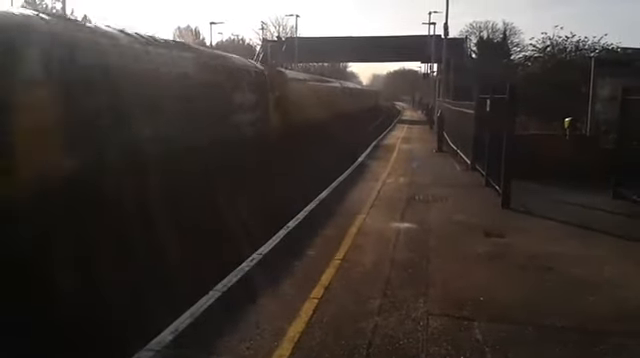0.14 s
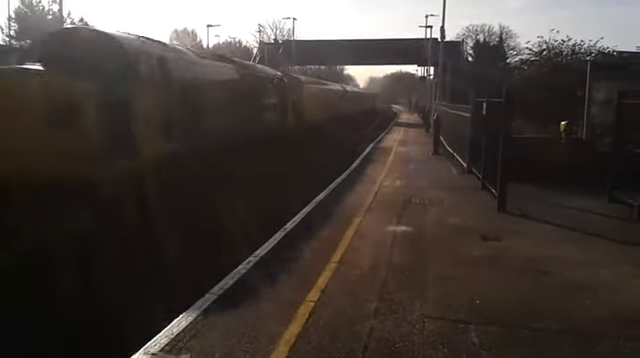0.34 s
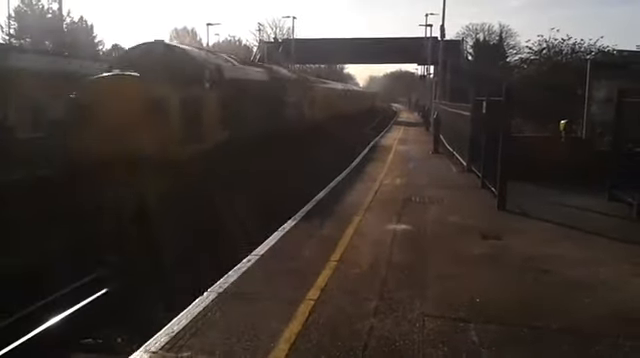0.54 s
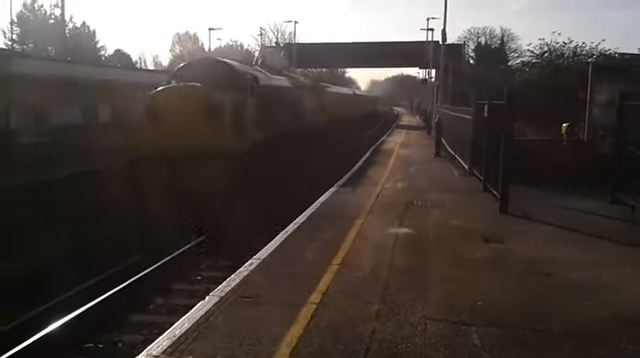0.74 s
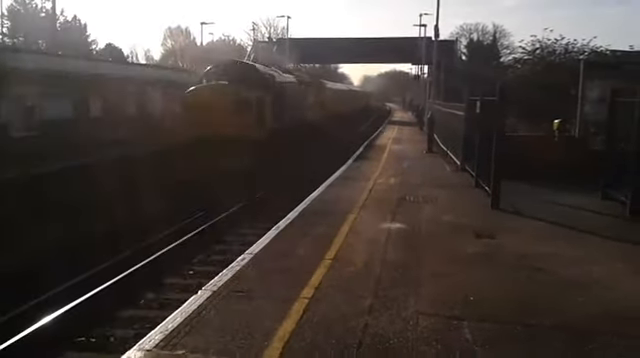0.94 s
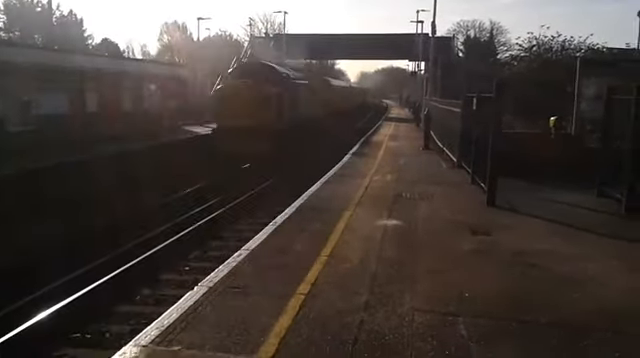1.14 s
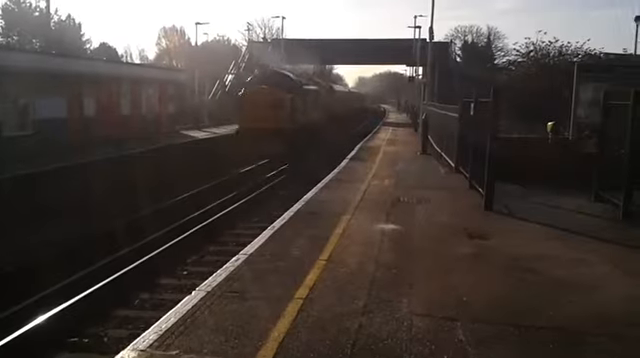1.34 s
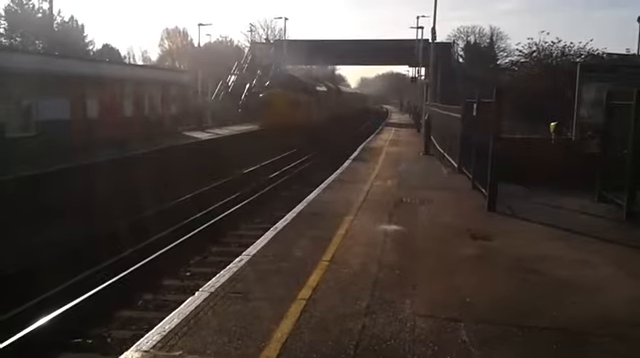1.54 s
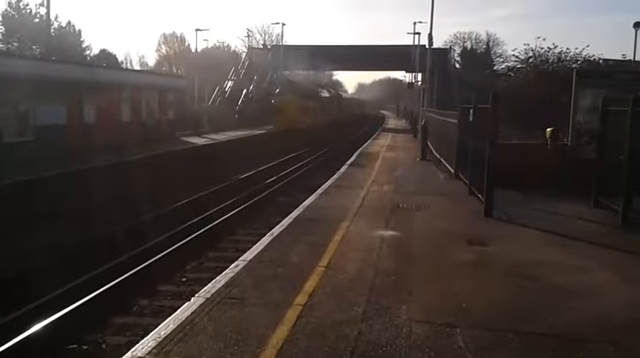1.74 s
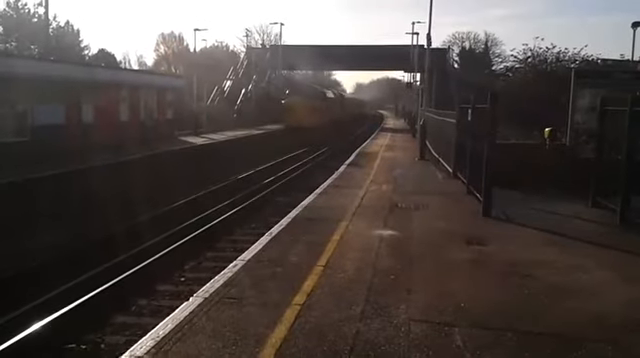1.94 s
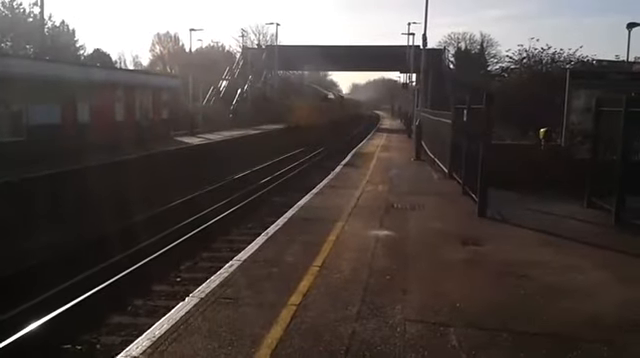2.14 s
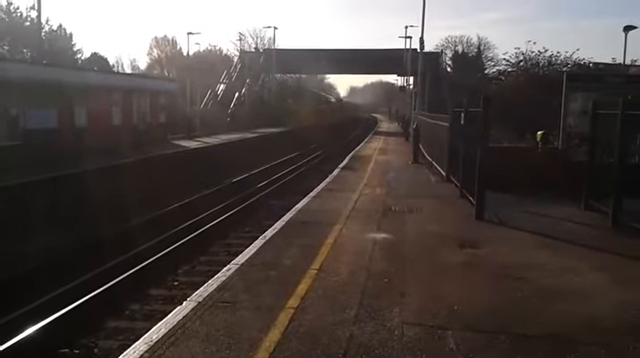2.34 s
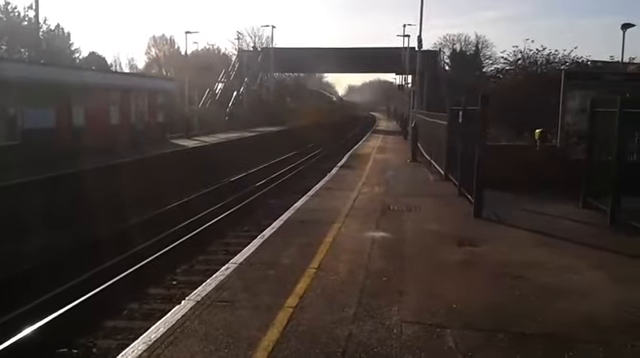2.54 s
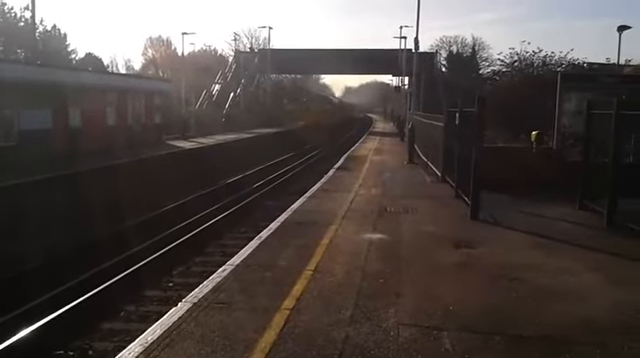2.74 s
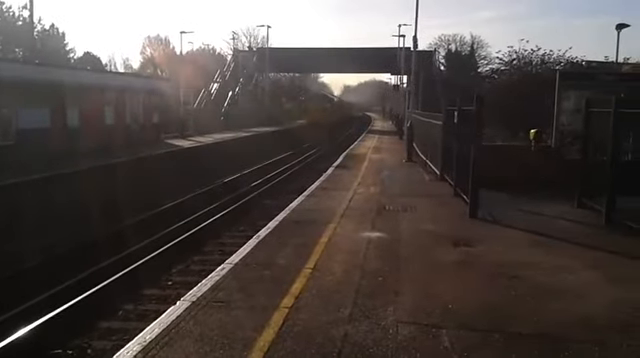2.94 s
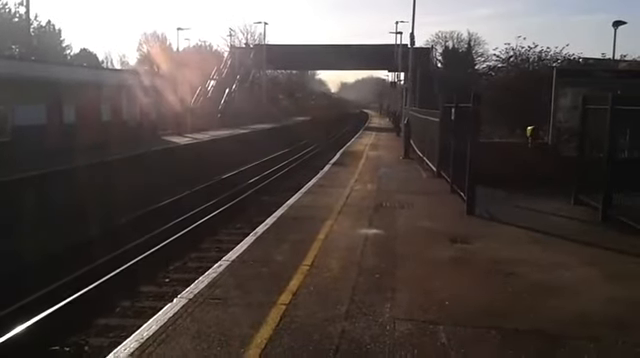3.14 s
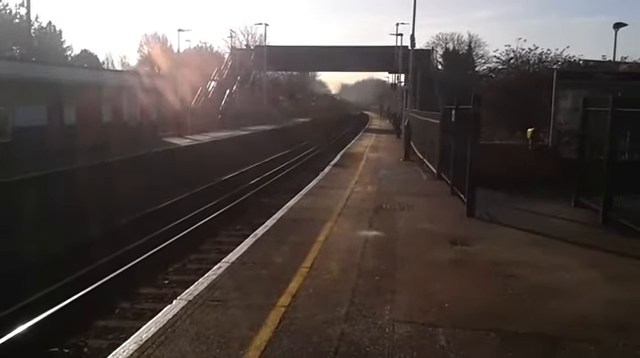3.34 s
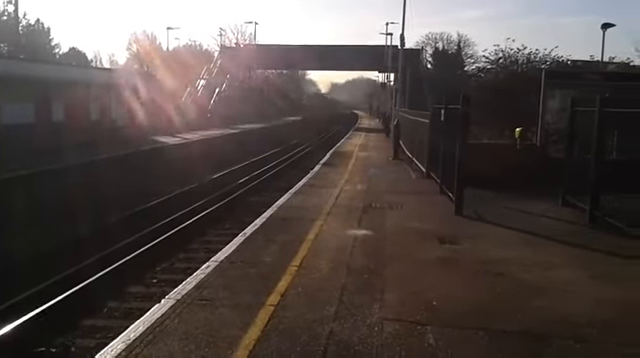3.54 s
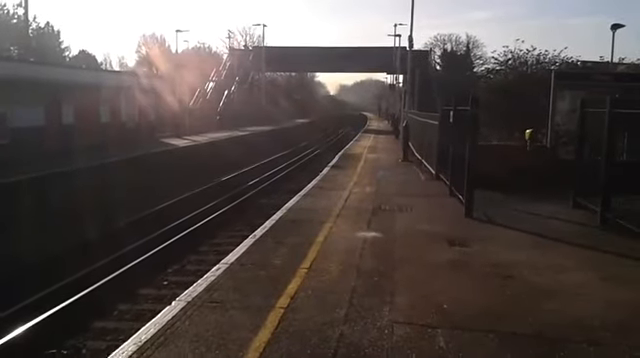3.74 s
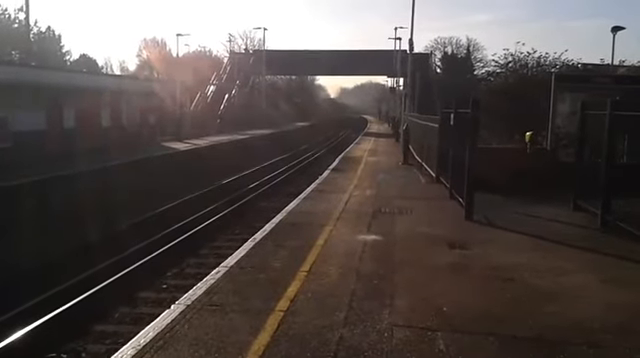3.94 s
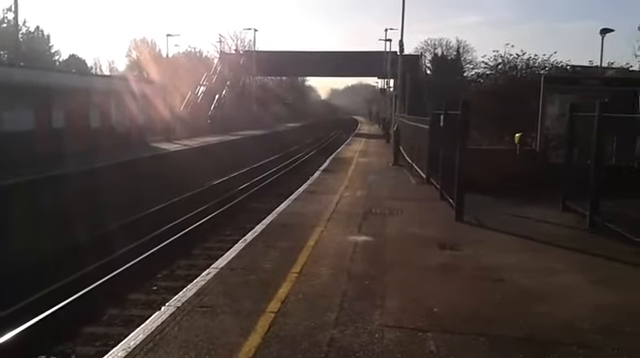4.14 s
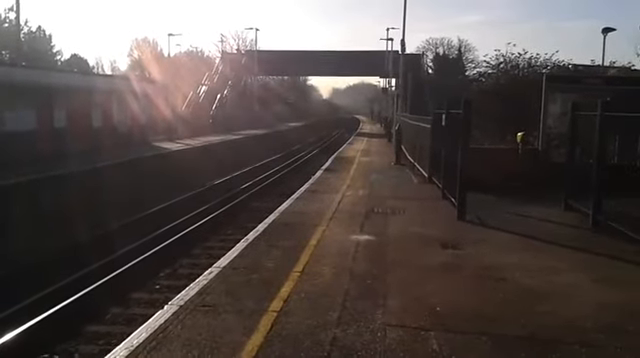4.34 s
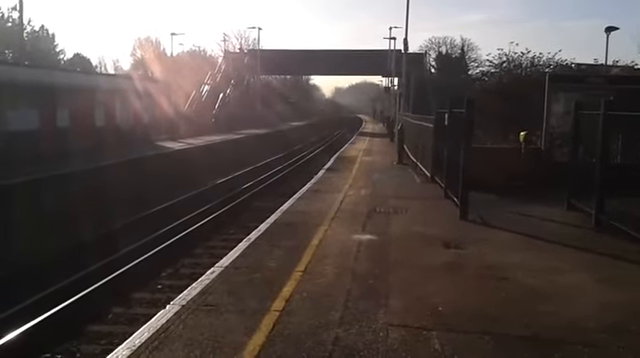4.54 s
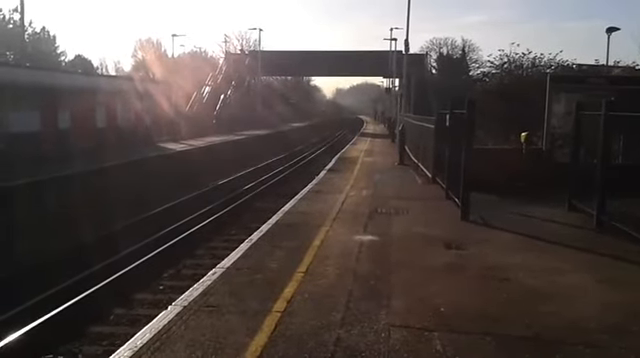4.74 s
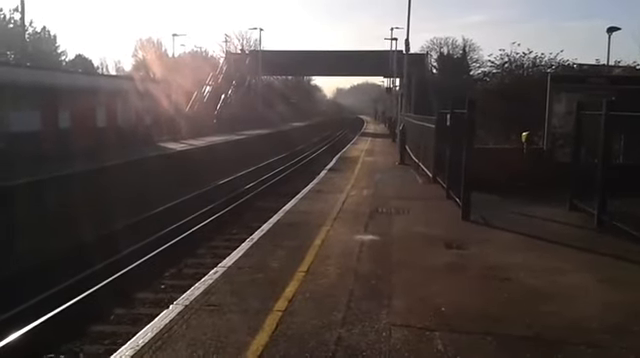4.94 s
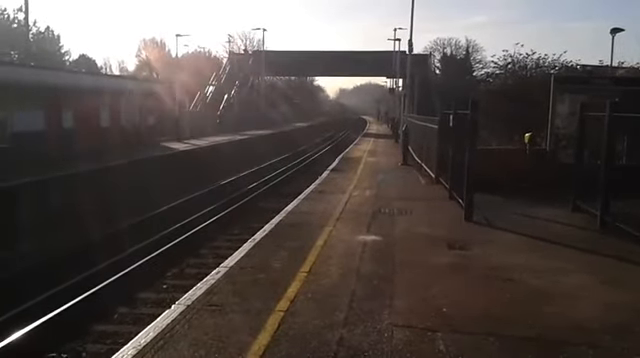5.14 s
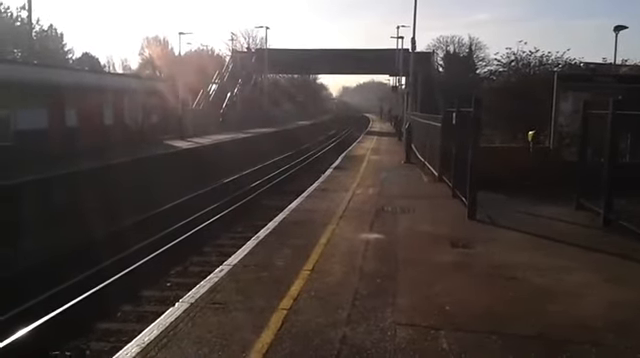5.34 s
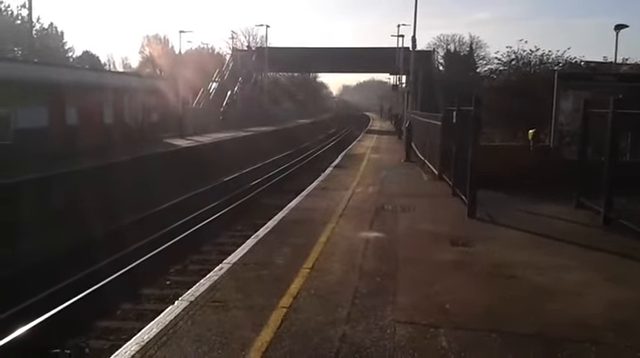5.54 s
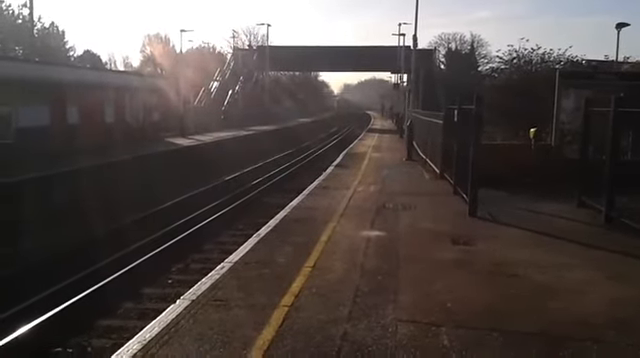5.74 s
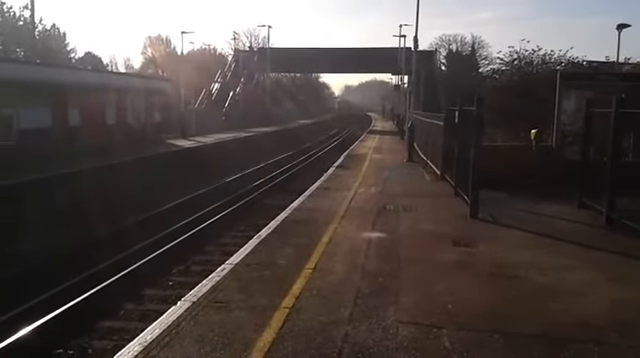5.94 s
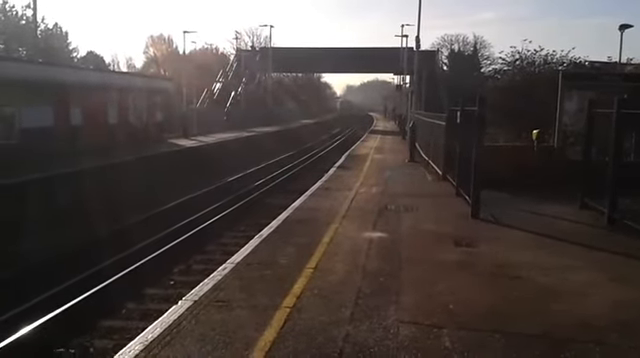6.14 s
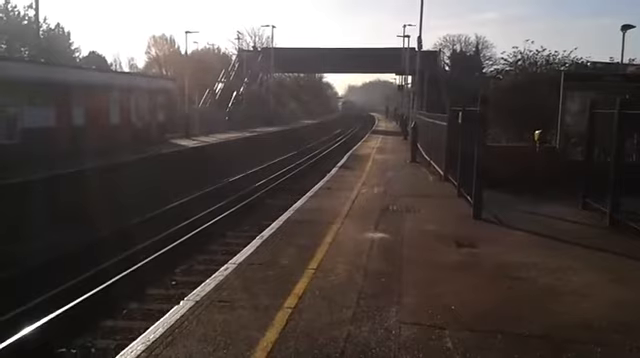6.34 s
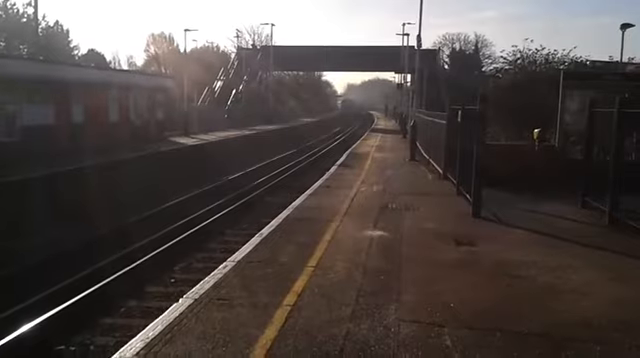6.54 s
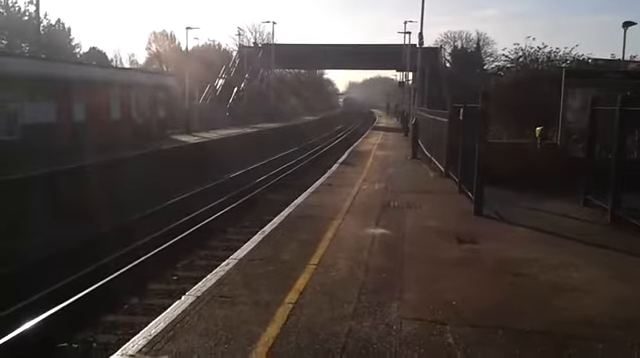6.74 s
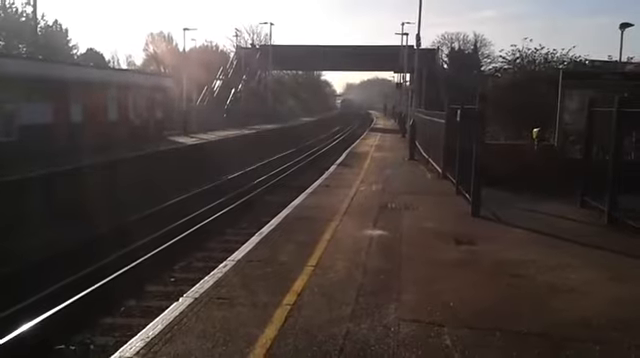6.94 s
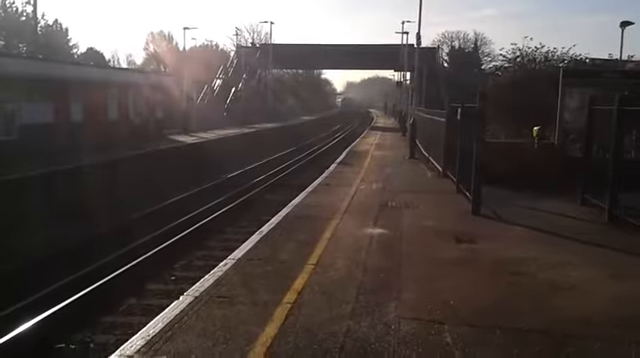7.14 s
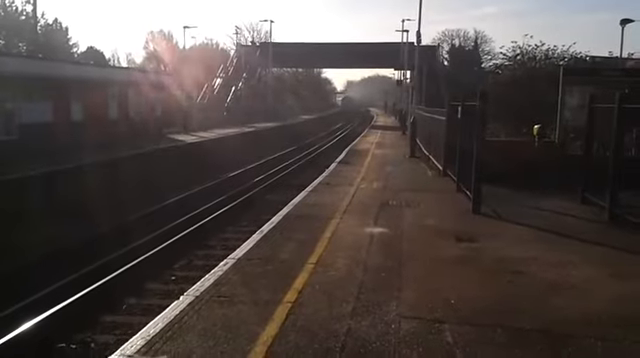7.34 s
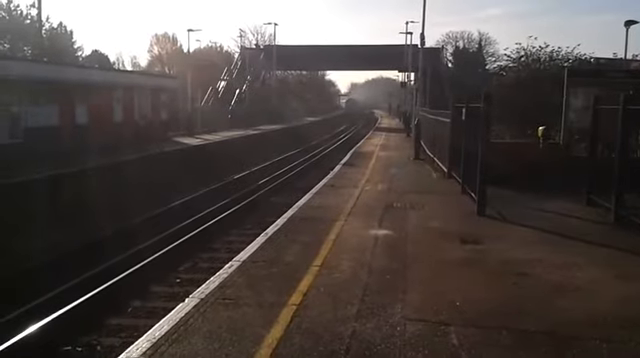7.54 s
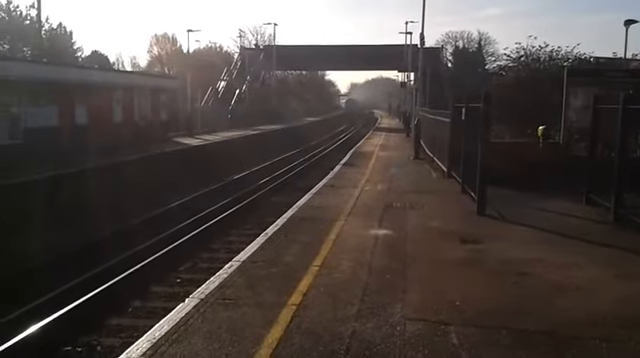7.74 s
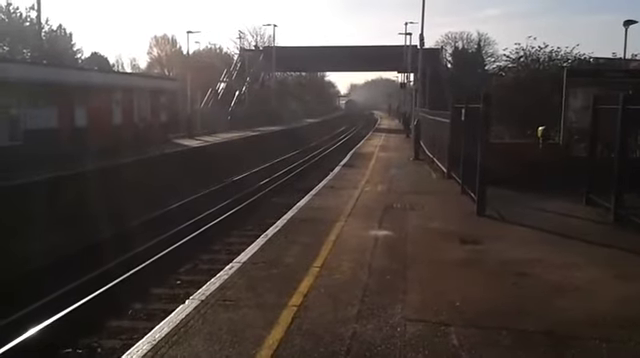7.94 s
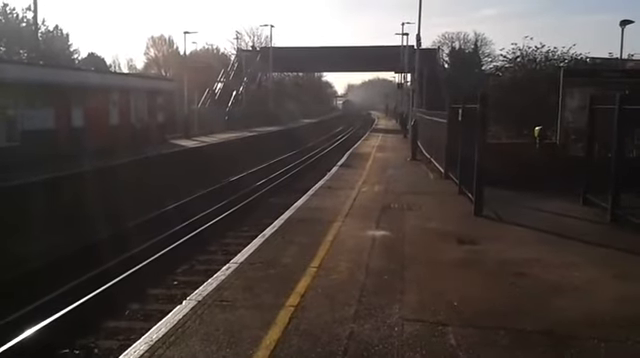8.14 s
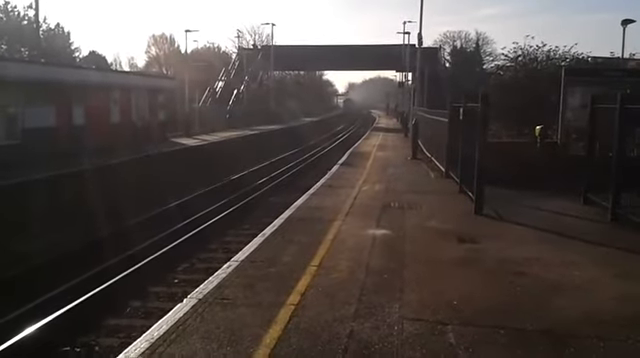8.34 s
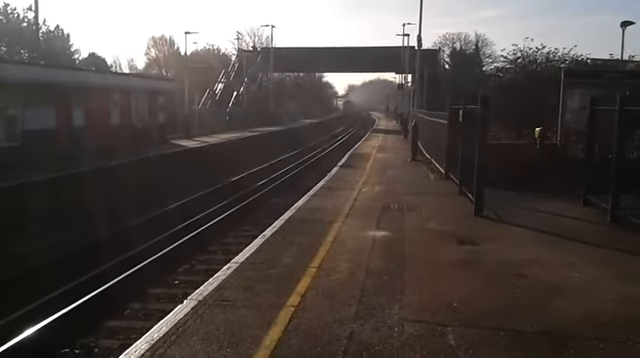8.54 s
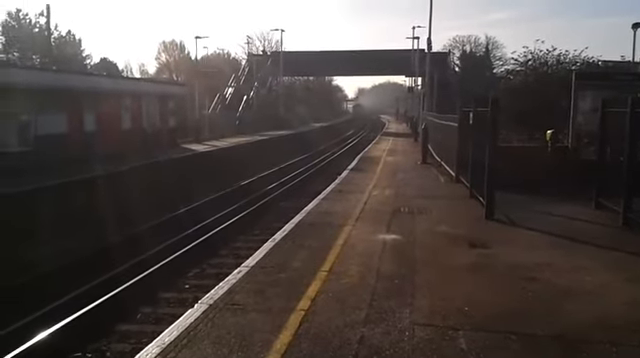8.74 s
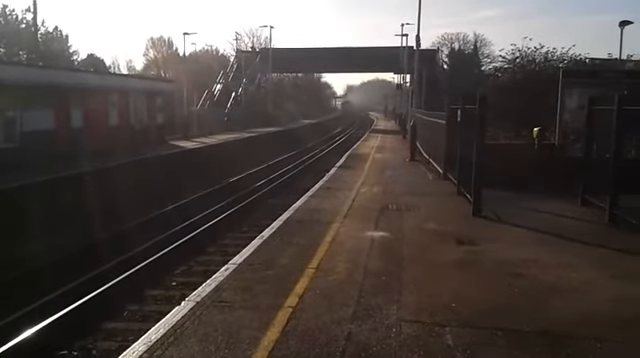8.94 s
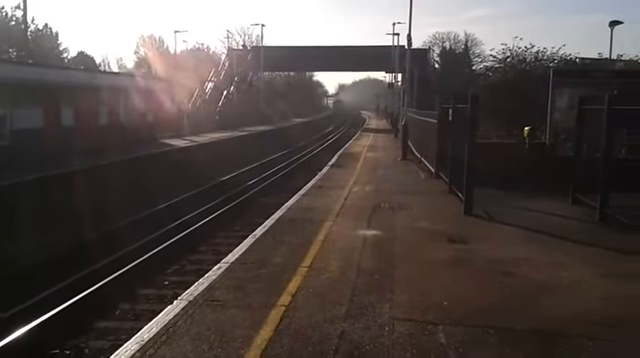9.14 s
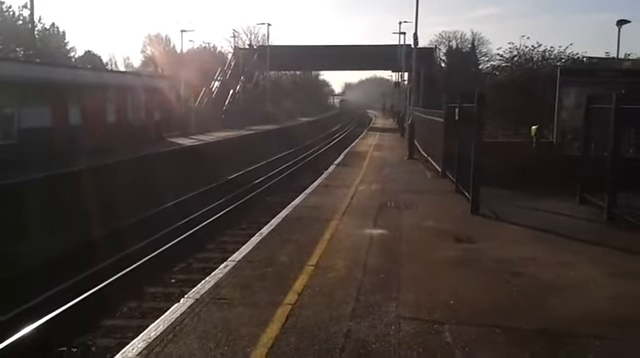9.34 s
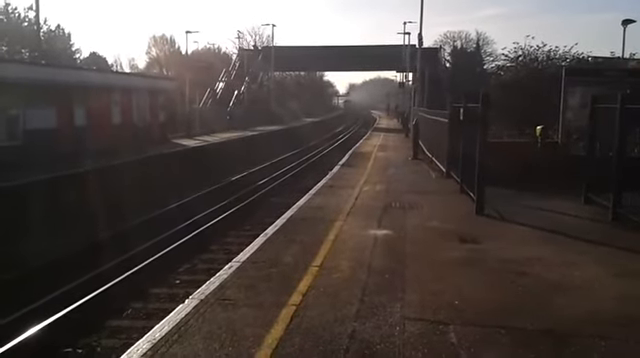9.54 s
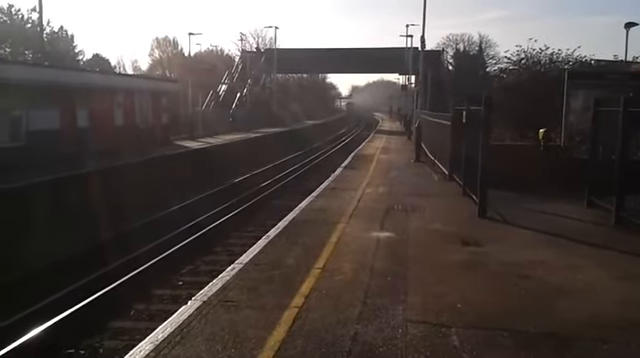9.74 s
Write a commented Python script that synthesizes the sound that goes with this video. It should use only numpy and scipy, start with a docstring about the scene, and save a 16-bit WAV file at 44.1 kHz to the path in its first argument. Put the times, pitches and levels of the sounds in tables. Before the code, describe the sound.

Beside an open station platform, the rear diesel locomotive of a fast train passes close to a fixed microphone. Broad wheel roar, dense clatter and bright metallic rattles come first. As it leaves, a pulsing exhaust throb and wavering gear and blower whines stand out, swelling around three seconds. A dull thump comes near six seconds as the throttle eases, then the throb slows and everything dulls and fades.

```python
"""A throbbing diesel, a broad roar of wheels on rails and bright rattles come first, close to the microphone:
the tail locomotive of a fast train leaves a station platform while one microphone stays behind.
Sine orders of the engine cycle make the throb, which slows as the throttle eases; wavering sines make the gear
and blower whines; shaped noise makes the roar, its treble pulsing with puffs of gas; short bursts make the
clatter, ticks and a dull thump. Noise sizzles at the very top, and the roar's treble dulls with distance."""
import sys
import numpy as np
from scipy import signal
from scipy.fft import rfft, irfft
from scipy.io import wavfile
from scipy.ndimage import uniform_filter1d, map_coordinates

SR = 44100
rng = np.random.default_rng(int(sys.argv[2]) if len(sys.argv) > 2 else 0)


def unload_wav(signal):
    """Save mono or channel-first audio to the path in sys.argv[1] as 16-bit WAV at rate SR, clipped to [-1, 1]."""
    wavfile.write(
        sys.argv[1],
        SR,
        np.round(np.clip(np.atleast_2d(signal).T, -1, 1) * 32767).astype(np.int16),
    )


N = 431298
TIME = np.arange(N) / SR
TOP_HZ = 11800  # top cut of the microphone
FRAME, HOP = 1024, 256  # samples per short-time spectrum, and between spectra

# Level of the train at the microphone, on which roar, swelling tones and patter ride.
# Each row: time in seconds, level in dB.
LEVEL = [(0, -31), (.8, -32.5), (1.3, -32), (2.2, -28), (3.1, -27), (4.3, -30), (5.5, -31), (6.6, -34),
         (8, -37.5), (9.78, -40)]
# Rate at which gear teeth meet, taken as the speed of the train. Each row: time in seconds, rate in Hz.
TOOTH_RATE = [(0, 283.1), (1.7, 281.7), (8, 301.3), (9.78, 305.8)]
# Base rate of the blower, which runs up once the engine eases. Each row: time in seconds, rate in Hz.
BLOWER_RATE = [(0, 1029), (.5, 1036), (1.2, 1036), (1.7, 1031), (3.9, 1040.5), (6.1, 1040), (6.6, 1047),
               (7, 1066), (7.6, 1084), (8.5, 1096), (9.78, 1104)]


def undb(db):
    """Decibels to gain."""
    return 10 ** (np.asarray(db) / 20)


def columns(table, at=TIME):
    """Curves over time, their rows joined by straight lines."""
    s, *rest = np.transpose(table)
    return [np.interp(at, s, column) for column in rest]


def walk(rate, size=N, per_s=SR):
    """Smooth chance with rate random knots a second, drawn from a spread of 1."""
    knots = rng.standard_normal(int(N / SR * rate) + 3)
    coarse = np.linspace(0, size, 8000)
    smooth = map_coordinates(knots, [coarse / per_s * rate], order=3)
    return np.interp(np.arange(size), coarse, smooth)


def tone(turns, db, waver_db, slip, rate):
    """A sine of rms db whose size (dB) and phase (slip, turns) waver on the way through moving air."""
    gain = np.sqrt(2) * undb(db + waver_db * walk(rate))
    return gain * np.sin(2 * np.pi * (turns + slip * walk(rate)))


def swell(db, peak_s, rise, fall):
    """Level of a tone that climbs to a peak and sinks again (dB/s), riding on the train's level."""
    before_s = np.maximum(peak_s - TIME, 0)
    after_s = np.maximum(TIME - peak_s, 0)
    return columns(LEVEL)[0] + db - rise * before_s - fall * after_s


def alongside(s, gone_s):
    """1 while the locomotive is next to the microphone, falling from half of gone_s to 0 at gone_s."""
    return np.clip(1 - s / gone_s, 0, .5) * 2


def eased():
    """How far the throttle has closed, 0 to 1."""
    start_s, ease_s = 5.95, 1.15
    return 1 - np.exp(-(np.maximum(TIME - start_s, 0) / ease_s) ** 2)


def coloured(points):
    """Noise with a spectrum drawn through (Hz, dB) points."""
    hz = np.maximum(np.arange(N // 2 + 1) * SR / N, 1)
    point_hz, point_db = np.transpose(points)
    db = np.interp(np.log(hz), np.log(point_hz), point_db)
    return irfft(rfft(rng.standard_normal(N)) * undb(db), N)


def frames(x):
    """Short-time spectrum: frequencies, times and values."""
    return signal.stft(x, SR, nperseg=FRAME, noverlap=FRAME - HOP)


def unframe(z):
    """Short-time spectrum back to a wave."""
    return signal.istft(z, SR, nperseg=FRAME, noverlap=FRAME - HOP)[1][:N]


def humps(hz, table, scale=1):
    """Sum of resonant humps or dips in dB; scale shifts their centres but not their widths."""
    return sum(lift_db / (1 + (2 * (hz - f * scale) / width) ** 2) for f, width, lift_db in table)


def ragged(hz, s, spread_hz):
    """Patchy chance over frequency and time that frays a spectral edge."""
    patches = rng.standard_normal((len(hz) // 5 + 1, len(s) // 5 + 1))
    return spread_hz * np.kron(patches, np.ones((5, 5)))[:len(hz), :len(s)]


def knocks(table, cycles, echoes):
    """Each row (s, dB, Hz) gives soft-edged bursts of a few cycles, one for each echo (lag s, dB)."""
    out = np.zeros(N)
    for s, db, hz in table:
        near = slice(max(int(s * SR) - SR // 20, 0), int(s * SR) + SR // 10)
        for lag_s, echo_db in echoes:
            t = TIME[near] - s - lag_s - cycles / hz  # 0 at the middle of the burst
            envelope = np.exp(-(t * hz / cycles * 2) ** 2)
            out[near] += undb(db + echo_db) * envelope * np.cos(2 * np.pi * hz * t)
    return out


def engine(rate, cycle):
    """Exhaust: firm low orders of the cycle, two carrying the boom, and a lumpy stack damped by the silencer."""
    # Firm low orders. Each row: dB over the train's level at the peak, peak in seconds, rise and fall in dB/s.
    low_swells = [(2, 5.2, 2.8, 1.3), (1, 5.2, 2.2, 2.9), (0, 1.1, 1.1, 2.6)]
    # Two orders that hand the boom back and forth. Each row: time in seconds, lower and upper level in dB.
    boom_tones = [(0, -26, -35), (.5, -29, -34.5), (1.1, -36, -33), (1.6, -23.5, -45), (1.9, -26.5, -21),
                  (2.3, -36, -20.5), (2.65, -15.5, -37), (2.9, -33, -42), (3.3, -38, -27),
                  (3.6, -29, -28.5), (4.6, -45, -37.5), (5.8, -40, -32.5), (6.5, -46, -49.5),
                  (9.78, -53.5, -61)]
    # Further orders of the uneven firing. Each row: order of the cycle, relative level in dB.
    stack_orders = [(14, -11.5), (16, -6.5), (20, -10.5), (22, -5), (23, -7), (25, -11.5), (27, -9.5),
                    (28, -12.5), (29, -10.5), (32, -5.5)]
    # Exhaust boom, the gain of the stack before a fixed trim. Each row: time in seconds, level in dB.
    boom = [(0, -26), (0.25, -18), (0.6, -27), (1.2, -24.5), (1.9, -17), (2.7, -17), (2.95, -29),
            (3.6, -25), (4.1, -26), (5.5, -28), (7, -22.5), (8, -29), (9.78, -30)]
    silencer_hz = 147.5  # orders above this are damped
    beat = cycle - 0.1289  # share of the cycle at which the first of three strong beats falls
    low = 0
    for order, row in zip((9, 12, 18), low_swells):
        low = low + tone(order * beat, swell(*row), .17 * order, .003 * order, 3)
    for order, db in zip((19, 21), columns(boom_tones)):
        low = low + tone(order * beat, db, 1.5, .05, 5)
    stack = 0
    for order, db in stack_orders:
        # every third order is in step: three beats a cycle
        start = rng.random() * (order % 3 > 0)
        damped_db = db - 0.12 * np.maximum(order * rate - silencer_hz, 0)
        stack = stack + tone(order * beat + start, damped_db, 2.4, 0.12, 4)
    return low + stack * undb(columns(boom)[0] - 7.5)


def gear_whine():
    """Gear teeth meshing: thin wavering lines at multiples of the tooth rate, breaking up and returning."""
    # Tooth tone and its octave. Each row: time in seconds, level in dB, octave level in dB.
    gear_tones = [(.1, -25, -44), (.3, -41, -44), (.9, -34, -36), (1.2, -45, -50), (1.7, -35.5, -50.5),
                  (2.2, -39.5, -45), (2.6, -32, -35), (3.1, -33.5, -33), (3.4, -40.5, -49),
                  (4.3, -42.5, -37), (5.1, -49, -41.5), (5.4, -47, -35.5), (6.7, -44, -36),
                  (7.4, -53.5, -47), (8.55, -60, -42.5), (9.78, -56, -48.5)]
    # Higher multiples. Each row: dB over the train's level at the peak, peak in seconds, rise and fall in dB/s.
    gear_swells = [(-5.5, 6.75, 38, 23), (-9, 8.8, 4.5, 2), (-9, 7.2, 9.7, 8.7), (-13.5, 1.6, 2.4, .1),
                   (-7.5, 2.9, 2.8, 6.5)]
    turns = np.cumsum(columns(TOOTH_RATE)[0]) / SR
    levels = columns(gear_tones) + [swell(*row) for row in gear_swells]
    multiples = (1, 2, 2.5, 3, 4, 5, 5.197)
    return sum(tone(k * turns, db, waver_db=2.6, slip=.1, rate=13) for k, db in zip(multiples, levels))


def blower_whine():
    """Blower: two multiples of its base rate that sing out in stretches and flicker more than the gears."""
    # Slow swell. Each row: dB over the train's level at the peak, peak in seconds, rise and fall in dB/s.
    blower_swells = [(-15, 5.2, 1, 0.15), (-13, 5.1, 0.78, 0.17)]
    # Singing out and sinking back. Each row: time in seconds, lift of the lower and of the upper tone in dB.
    blower_sings = [(0, 4, 4), (1, 12, 7), (1.7, 0, 4.5), (2.7, 3.5, 2.5), (3.1, 4.5, 3.5), (3.6, 5, -2),
                    (3.9, 10, 10.5), (4.5, -22, -6), (5.3, -4, -0.5), (5.9, -1, 3), (6.4, -2.5, 3),
                    (6.8, 5, 1.5), (7.1, -2, -0.5), (7.45, 1, 6.5), (8.1, 6, -3), (8.65, 4, 4), (9, 1, -1),
                    (9.4, 3, 6.5)]
    turns = np.cumsum(columns(BLOWER_RATE)[0]) / SR
    out = 0
    for k, row, lift_db in zip((3, 4), blower_swells, columns(blower_sings)):
        out = out + tone(k * turns, swell(*row) + lift_db, waver_db=3.2, slip=.3, rate=24)
    return out


def puffing(cycle, width, depth):
    """Gain that swells with each puff of gas, less once eased; sizes scatter from cycle to cycle."""
    # Puffs, one per pair of cylinders. Each row: place in the cycle from 0 to 1, relative size in dB.
    puff_places = [(.07, -0.5), (.26, 4.5), (.42, 5), (.61, 3.5), (.77, 4.5), (.95, 6)]
    scatter = rng.standard_normal((80, len(puff_places)))
    gate = 0
    for k, (place, db) in enumerate(puff_places):
        nearest = np.round(cycle - place)
        size = undb(db + 2.4 * scatter[nearest.astype(int) + 1, k])
        gate = gate + size * np.exp(-((cycle - place - nearest) / width) ** 2)
    gain = 1 + depth * gate * (1 - .5 * eased())
    return gain / np.sqrt(uniform_filter1d(gain ** 2, SR))  # steady power over a second


def roar(cycle):
    """Wheels, rails and gas: noise whose regions drift with distance, flicker and surge, its treble puffing."""
    # Raw colour of the noise, before each region is levelled. Each row: frequency in Hz, level in dB.
    colour = [(28, -31), (69, -1.5), (127, 3.5), (218, -5), (600, -5.5), (1060, -14.5), (2000, -23),
              (2610, -34.5), (3100, -27.5), (4250, -27), (4700, -29), (6200, -28), (7800, -43.5),
              (8400, -40), (9500, -49.5)]
    # Regions from rumble to clatter. Each row: centre in Hz, dB over the train's level,
    # drift with distance in dB/s, lift alongside in dB, time in seconds by which that lift is gone.
    regions = [(60, -4, 0.96, 5.5, 2.6), (272, -3, -0.1, 9, 1.03), (704, -4.5, 0.62, 6, 2.02),
               (1550, -1.2, 0.09, 1.8, 1.4), (3860, -6, 0.47, 8, 1.67), (6200, 0, -1.16, 3, 1.6)]
    # Rail roughness, climbing with speed. Each row: starting frequency in Hz, width in Hz, lift in dB.
    rail = [(537, 19, 9), (1430, 75, 6), (1887, 99, 4.5), (272, 61, 4.5)]
    # The locomotive's flank, heard alongside. Each row: frequency in Hz, width in Hz, lift or dip in dB.
    flank = [(638, 28, 10), (2650, 310, 5), (5830, 850, 5), (4730, 510, -5.5)]
    # Rough air climbing with the blower. Each row: starting frequency in Hz, width in Hz, lift in dB.
    blower_air = [(3140, 110, 3), (4200, 100, 1), (6175, 60, 5)]
    # Middle of the frayed edge where the treble ends. Each row: time in seconds, frequency in Hz.
    edge = [(0, 9980), (1.5, 8290), (3.5, 8580), (4.2, 8200), (4.7, 7560), (6, 7400), (9.78, 6970)]
    calms_by_s = 20  # distance evens out the flicker and surge toward this time
    gas_drop_s, gas_drop_db = 5.1, 2.5  # the rush of gas drops shortly before the engine slows

    hz, s, z = frames(coloured(colour))
    centre_hz, over_db, drift, lift_db, gone_s = np.transpose(regions)[:, :, None]
    wanted_db = columns(LEVEL, s)[0] + over_db + drift * s + lift_db * alongside(s, gone_s)
    borders = np.searchsorted(hz, [30, 120, 420, 1100, 2500, 4800, 7000])
    power = np.mean(abs(z) ** 2, axis=1)
    own_db = [10 * np.log10(np.sum(power[a:b])) for a, b in zip(borders, borders[1:])]
    flicker = np.array([walk(11, size=len(s), per_s=SR / HOP) for _ in regions])
    surge = np.array([walk(3.52, size=len(s), per_s=SR / HOP) for _ in regions])
    unrest_db = (1.1 * flicker + 0.8 * surge) * (1 - s / calms_by_s)
    region_db = wanted_db - np.array(own_db)[:, None] + unrest_db

    # blend between region centres, so that neighbours move together
    place = np.interp(np.log(hz + 1), np.log(centre_hz[:, 0]), np.arange(len(regions)))
    grid = np.meshgrid(place, np.arange(len(s)), indexing="ij")
    db = map_coordinates(region_db, grid, order=1)
    hz = hz[:, None]
    speed = columns(TOOTH_RATE, s)[0] / TOOTH_RATE[0][1]
    blower_speed = columns(BLOWER_RATE, s)[0] / BLOWER_RATE[0][1]
    db = db + humps(hz, rail, speed) + humps(hz, blower_air, blower_speed)
    db = db + humps(hz, flank) * alongside(s, gone_s=2.04)
    edge_hz = columns(edge, s)[0]
    z = z * undb(db) * (hz < edge_hz + ragged(hz, s, .16 * (edge_hz - 6700)))

    gas = np.clip((hz - 900) / 2500, 0, 1)  # the engine cycle shows mostly in the treble
    dropped = np.clip((TIME - gas_drop_s) * 5, 0, 1)
    gas_gain = puffing(cycle, width=0.067, depth=0.3) * undb(-gas_drop_db * dropped)
    return unframe(z * (1 - gas)) + unframe(z * gas) * gas_gain


def sizzle():
    """Noise under the top cut: louder swells reach lower; from about 2.6 s a thin thread stays between them."""
    # Swells that come and go. Each row: start in seconds, end in seconds, nominal level in dB.
    sizzle_swells = [(0, 0.543, -54), (1.18, 1.48, -45.5), (1.445, 1.76, -51), (1.908, 2.084, -49.5),
                     (2.193, 2.324, -46.5), (2.675, 2.982, -41.5), (3.09, 3.535, -38), (3.71, 3.982, -37),
                     (3.99, 4.72, -40.5), (4.643, 5.408, -42.5), (6.001, 6.303, -47), (6.366, 6.559, -48.5),
                     (6.747, 7.078, -50.5), (7.13, 7.627, -49.5), (7.724, 8.057, -52.5),
                     (8.067, 9.007, -55), (9.327, 9.514, -56)]
    hz, s, z = frames(coloured([(9000, -5.5), (10500, 1.0), (11600, 10.5)]))
    top = z[(hz > 11000) & (hz < TOP_HZ)]
    z = z / np.sqrt(np.sum(np.mean(abs(top) ** 2, axis=1)))
    depth_hz = 0 * s
    db = np.interp(s, [2.5, 2.7, 9.8], [-120, -53, -66])  # the thin thread
    for start, end, swell_db in sizzle_swells:
        reach = np.clip(1 - (2 * (s - start) / (end - start) - 1) ** 4, 0, 1)
        depth_hz = np.maximum(depth_hz, reach * 85 * (swell_db + 61.5))
        db = np.where(reach > 0, swell_db + 6 * (reach - .7), db)
    hz = hz[:, None]
    above = hz > 11500 - depth_hz + ragged(hz[:, 0], s, 220)
    return unframe(z * undb(db) * above * (hz < TOP_HZ))


def scattered(count, until_s, low_hz, high_hz, over_db, spread_db):
    """Rows (s, dB, Hz) at random moments and pitches, riding on the train's level."""
    when, pitch, size = rng.random((count, 3)).T
    s = when * until_s
    db = columns(LEVEL, s)[0] + over_db - spread_db * size
    return np.transpose([s, db, low_hz * (high_hz / low_hz) ** pitch])


def clatter():
    """Clatter: listed low clanks, bright echoing rattles mostly early on, and a random patter, densest at first."""
    # Low clanks of the running gear. Each row: start in seconds, peak in dB, frequency in Hz.
    clanks = [(.578, -15, 576), (.703, -16.5, 1280), (.8, -16.5, 950), (.853, -14.5, 677), (.94, -20, 700),
              (1.461, -20, 690), (1.851, -22, 1430), (3.05, -17, 1470), (3.15, -22, 1430),
              (3.35, -15.5, 1240), (4.76, -16.5, 1320), (7.677, -32, 1210), (7.779, -26, 1210),
              (8.938, -21, 1550)]
    # Bright rattles. Each row: start in seconds, level in dB before the echo gains, frequency in Hz.
    rattles = [(.0368, -15, 5500), (.1845, -17, 5900), (.3596, -11, 6130), (.5077, -12, 6090),
               (.7322, -17, 6330), (.7547, -14, 5960), (1.0345, -14, 6130), (3.5344, -17, 3970),
               (5.39, -25, 4350), (6.83, -28, 3150)]
    patter = scattered(count=300, until_s=9.6, low_hz=450, high_hz=2100, over_db=5, spread_db=6)
    close = scattered(count=260, until_s=1.15, low_hz=400, high_hz=1600, over_db=6, spread_db=7)
    low = knocks([*clanks, *patter, *close], cycles=7, echoes=((0.00037, 0.0031),))
    bright = knocks(rattles, cycles=21.82, echoes=((0, -0.5), (.007, -11), (.016, -15)))
    return low + bright


def ticks():
    """Sharp metallic ticks, each a rattle of three quick bursts."""
    # Each row: start in seconds, level in dB before the echo gains, frequency in Hz.
    tick_rows = [(5.7367, -27.5, 3890), (6.76, -31, 4300), (7.0357, -26.5, 5550)]
    return knocks(tick_rows, cycles=4.74, echoes=((0, 9.6), (.003, 10), (.0058, 3)))


def thump():
    """A dull thump of quick low blows under the roar."""
    # Each row: start in seconds, peak in dB, frequency in Hz.
    blows = [(5.921, -11, 151), (5.943, -20, 128), (5.963, -16, 89)]
    return knocks(blows, cycles=0.83, echoes=((0.0023, 0),))


def scene():
    """The engine sags slowly, then slows as the driver eases off; one microphone feeds both channels."""
    full_cycles_s, sag_cycles_s2, eased_cycles_s = 6.69, .008, .83  # four-stroke cycles per s, sag, drop
    rate = full_cycles_s - sag_cycles_s2 * TIME - eased_cycles_s * eased()
    cycle = np.cumsum(rate) / SR
    sound = engine(rate, cycle) + gear_whine() + blower_whine() + roar(cycle)
    sound = sound + sizzle() + clatter() + ticks() + thump()
    return np.array([sound, sound])


def record(dry):
    """The microphone thins the deep bass below 35 Hz and cuts the top steeply."""
    thin = signal.sosfilt(signal.butter(2, 35, "high", fs=SR, output="sos"), dry)
    return signal.sosfilt(signal.ellip(10, .2, 80, TOP_HZ, fs=SR, output="sos"), thin)


dry = scene()
out = record(dry)
unload_wav(out)
```